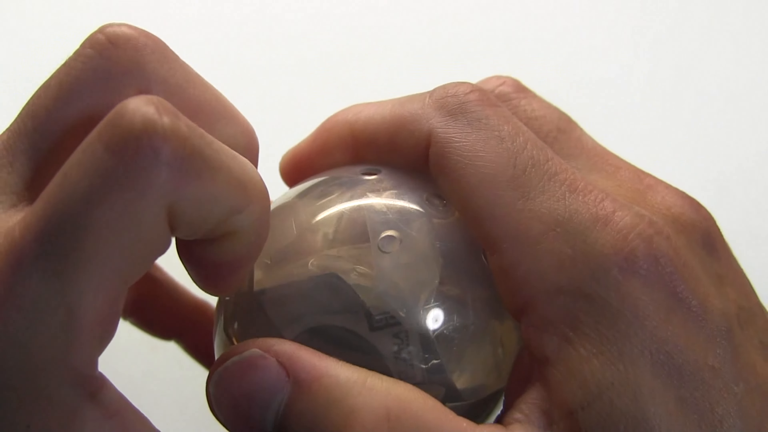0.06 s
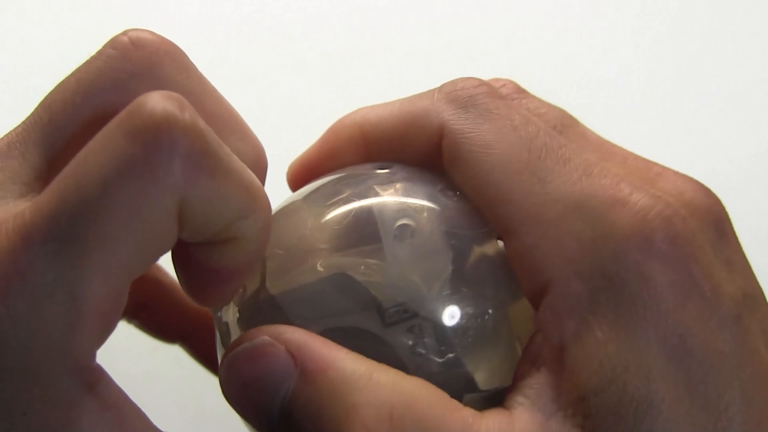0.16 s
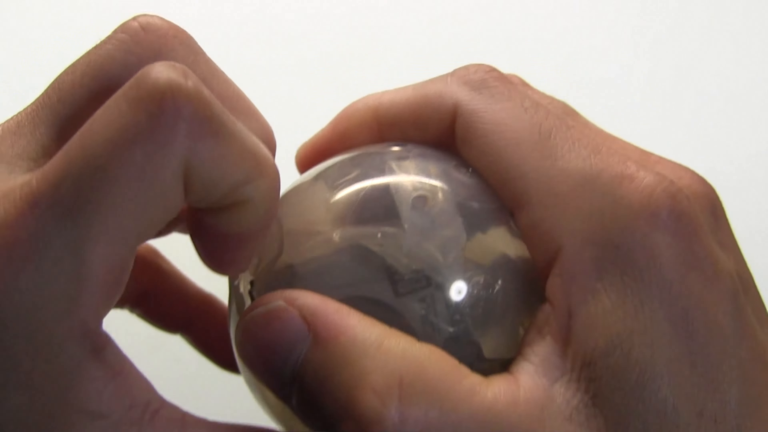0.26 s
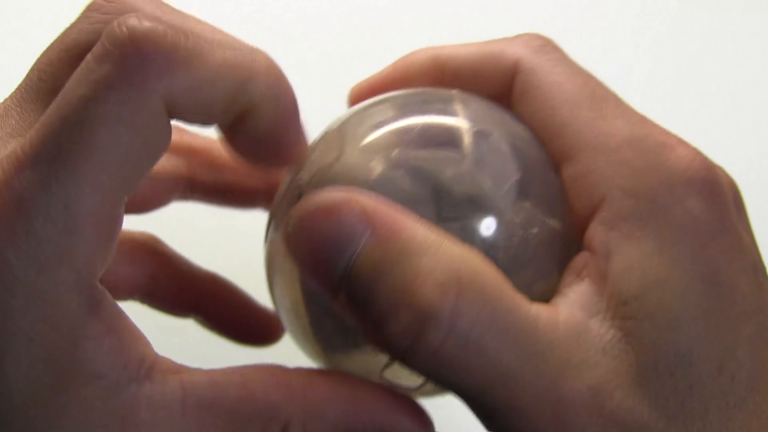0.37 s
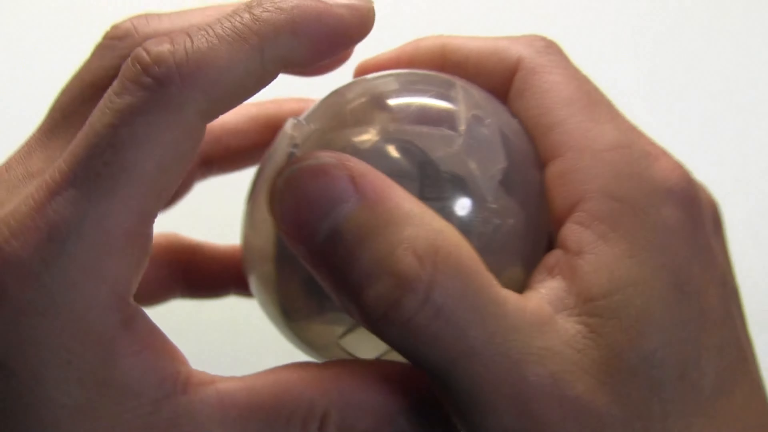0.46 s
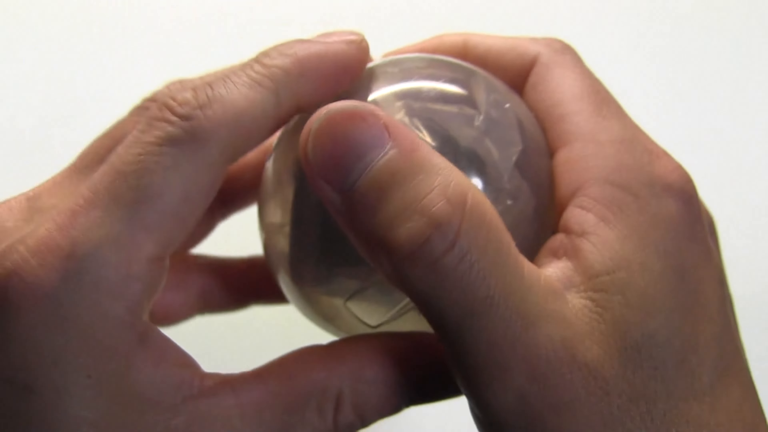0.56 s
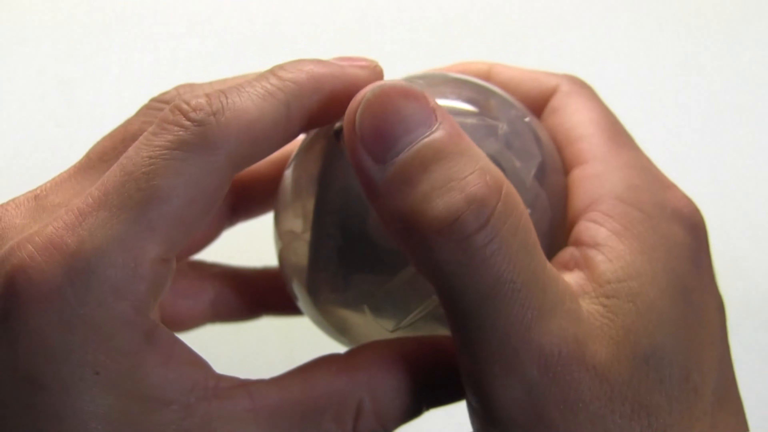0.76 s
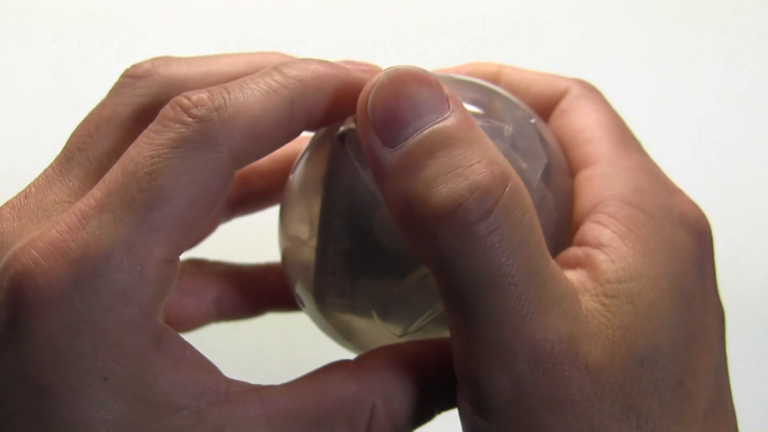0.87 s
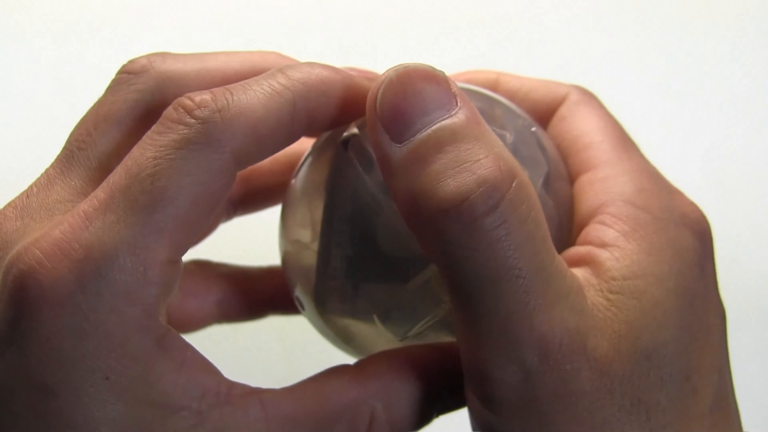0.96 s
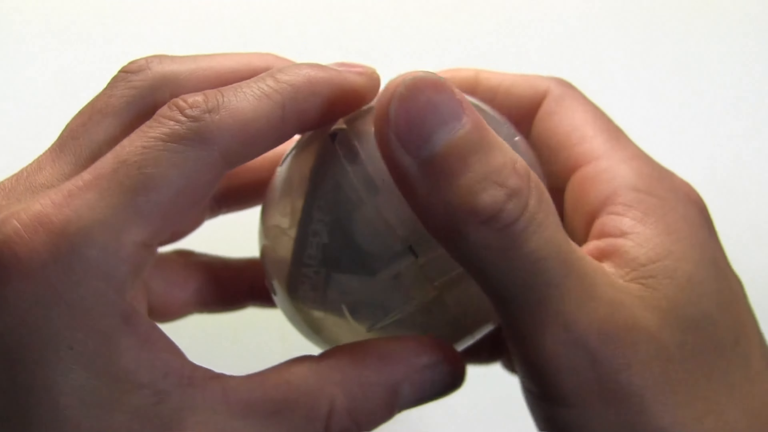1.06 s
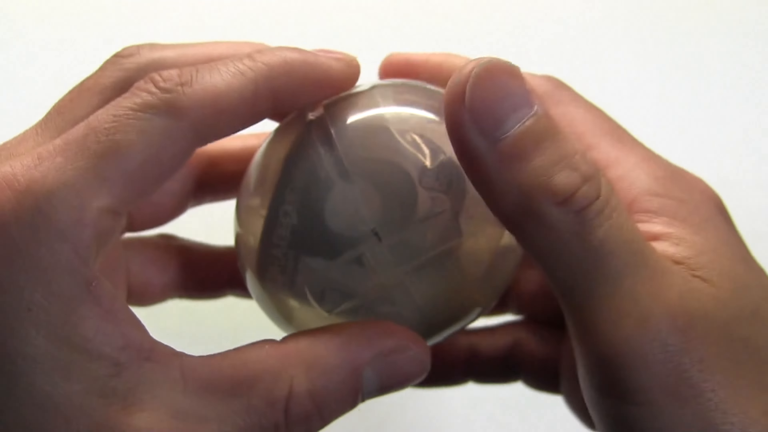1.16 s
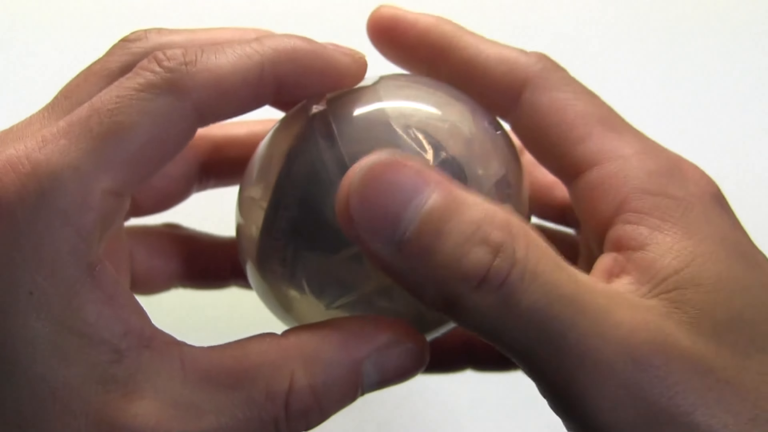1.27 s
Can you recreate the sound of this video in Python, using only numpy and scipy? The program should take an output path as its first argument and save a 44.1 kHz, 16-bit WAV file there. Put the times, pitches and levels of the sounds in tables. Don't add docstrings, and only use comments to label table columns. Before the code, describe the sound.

Two hard plastic clicks from a squeezed hollow shell, followed by light rattling ticks, close up

```python
import sys
import numpy as np
from scipy import signal
from scipy.fft import rfft, irfft
from scipy.io import wavfile

SR = 44100
rng = np.random.default_rng(int(sys.argv[2]) if len(sys.argv) > 2 else 0)


def magnitude_from_level(level_db):
    exponent = np.asarray(level_db, float) / 20
    return 10 ** exponent


def transcribe(signal):
    frames = np.atleast_2d(signal).T
    limited = np.clip(frames, -1, 1)
    pcm = np.round(limited * 32767).astype(np.int16)
    wavfile.write(sys.argv[1], SR, pcm)


N = 57330


def evened(x):
    return x / np.sqrt(np.mean(x ** 2) + 1e-20)


def read(points, hz):
    f, value = np.transpose(points)
    return np.interp(np.log(hz + 1), np.log(f + 1), value)


def add(mix, s, sound):
    part = mix[max(round(s * SR), 0):][:len(sound)]
    part += sound[:len(part)]


def colour(x, gain):
    return irfft(rfft(x) * gain(np.fft.rfftfreq(N, 1 / SR)), N)


# frequency_hz, level_db
AIR_TONE = [(25, -25), (60, -9), (150, -9.5), (250, -8), (420, -9), (820, -9), (7700, -22.5), (16000, -33)]
AIR_DB = -62
# centre_hz, width_hz, level_db
HUM = [(59, 14, -79.5), (153.1, 33, -72), (263.7, 45, -69.5), (353.2, 52, -74.5)]
# frequency_hz, coherence (0 to 1)
COHERENCE = [(60, 0.81), (290, 0.27), (700, 0.37), (1400, .35), (3100, 0.74), (8000, .4), (15000, .1)]


def air():
    first, second, hum_noise = rng.standard_normal((3, N))

    def alike(hz):
        return np.clip(read(COHERENCE, hz), 0, 1)

    def unlike(hz):
        return np.sqrt(1 - alike(hz) ** 2)

    pair = np.array([first, colour(first, alike) + colour(second, unlike)])
    out = magnitude_from_level(AIR_DB) * evened(colour(pair, lambda hz: magnitude_from_level(read(AIR_TONE, hz))))
    for centre_hz, width_hz, db in HUM:
        hum = colour(hum_noise, lambda hz: 1 / (1 + (2 * (hz - centre_hz) / width_hz) ** 2))
        out = out + magnitude_from_level(db) * evened(hum)
    return out


# frequency_hz, density_db
SKIN_TONE = [(300, -33.5), (550, -7.5), (900, 1), (1400, -4.5), (2500, -4.5), (6000, -13), (10000, -20),
             (16000, -44.5)]
# middle_s, length_s, level_db, brightness_db_per_octave
SLIDES = [(0.004, 0.11, -68.5, 6), (0.213, 0.2325, -61, 1.5), (0.263, 0.0643, -52.5, -9),
          (0.281, 0.031, -70.5, -10), (0.413, 0.0603, -54, -5), (0.463, 0.2736, -60.5, 4.5),
          (0.59, 0.144, -62.5, -0.53), (0.667, 0.081, -60, -6), (0.775, 0.069, -60.5, -2),
          (0.901, 0.118, -55, 0.93), (0.96, 0.046, -58.5, 0), (1.001, 0.0492, -64, 1.5),
          (1.087, .06, -63.5, 0), (1.149, 0.0716, -60, 6.5), (1.202, 0.0846, -58.5, 2.5),
          (1.264, 0.0824, -65.5, 10.5)]
GRIT_PER_S, GRIT_DB = 16000, 1.1764


def skin():
    t, out = np.arange(N) / SR, np.zeros(N)
    slips = rng.random(N) < GRIT_PER_S / SR
    grit = slips * rng.standard_normal(N) * magnitude_from_level(GRIT_DB * rng.exponential(1, N))
    for middle_s, length_s, db, tilt_db in SLIDES:
        swell = np.cos(np.pi * np.clip((t - middle_s) / length_s, -.5, .5)) ** 2
        rub = colour(grit, lambda hz: magnitude_from_level(read(SKIN_TONE, hz) + tilt_db * np.log2(hz / 2000 + .01)))
        out += magnitude_from_level(db) * swell * evened(rub)
    return out


RISE_CYCLES = 0.3765


def ring(modes, scale):
    t = np.arange(SR // 20) / SR
    out = 0
    for k, (hz, db, t60_s) in enumerate(modes):
        decay = magnitude_from_level(db - 60 * t / t60_s)
        rise = 1 - np.exp(-t * hz * scale / RISE_CYCLES)
        out = out + (-1) ** k * decay * np.sin(2 * np.pi * hz * scale * t) * rise
    return out


TICK_DB, SLIPS_PER_S, FOLLOW = -1.5, 1800, 0.62


def rattle(events, bodies):
    out, t = np.zeros(N), np.arange(600) / SR
    draw = rng.random((len(events), 2, 600))
    for (s, db, *_, length_s), (when, size), body in zip(events, draw, bodies):
        decay = np.exp(-t / max(length_s, 1e-4))
        later = (when < SLIPS_PER_S / SR) * FOLLOW * (2 * size - 1) * decay
        sound = np.convolve(later + (t == 0), body)
        add(out, s, magnitude_from_level(db + TICK_DB) * sound / abs(sound).max())
    return out


# start_s, level_db, pitch_hz, overtones_db, rattle_s
TICKS = [(0.153, -49, 800, 15, 0.00315), (0.313, -46.5, 1114, 15, 0.003), (0.452, -35, 900, 9, 0.0044),
         (0.476, -42, 790, 0.5, 0.00376), (0.563, -38, 1037, -3, 0.0025), (0.5665, -32, 1090, -1, 0.0019),
         (.5695, -33.5, 1064, -5, 0.00247), (0.5839, -42, 780, 0.5, 0.0011),
         (.6023, -48.5, 1112, 12, 0.0019), (0.63, -41, 900, -1.5, 0.00099),
         (0.656, -44.5, 696, -11.5, 0.0024), (0.6651, -36.5, 1150, -6, 0.0047),
         (0.693, -30, 1093, -10.5, 0.00047), (0.7327, -40, 807, -2, 0.00177),
         (0.738, -43.5, 699, -15, 0.0039), (0.7611, -35.5, 1080, -11, 0.00196),
         (0.783, -47.5, 706, -7.5, 0.0025), (0.816, -50, 848, 3, 0.0043),
         (0.823, -47.5, 722, -13.5, 0.00225), (1.089, -49, 816, -14.5, 0.00506),
         (1.14, -46.5, 420, -10.5, 0.00546), (1.231, -51.5, 725, -12, 0.0066),
         (1.211, -38.5, 690, -5.5, 0.00258), (1.252, -50, 900, -13.5, 0.004),
         (1.258, -49, 1067, -12, 0.0031), (0.594, -50.5, 840, -12.5, .002), (0.57, -38.5, 1053, -7, 0.0021)]
# pitch_multiple, level_db, t60_s
KNOCK_MODES = [(1.0, 0, .011), (1.35, -3, .007), (1.65, -8, .006), (2.1, -2, .008), (2.55, -9, .006),
               (3.05, -10, .006)]
# start_s, level_db, pitch_scale, rattle_s
EDGES = [(0.158, -53, 0.64, .002), (.313, -49.5, 0.96, 0.0046), (0.5627, -47.5, 1.06, .002),
         (.567, -36, 1.051, 0.0042), (.6023, -39.5, 0.844, 0.0086), (0.632, -49.5, 0.96, 0.00089),
         (.657, -49.5, 0.935, .001), (0.666, -40, 1.03, 0.0028), (0.695, -46.5, 1, 0.00057),
         (0.762, -44.5, 0.922, 0.00154), (1.2109, -52, 1.4, .001)]
# frequency_hz, level_db, t60_s
EDGE_MODES = [(4205, -5.5, 0.0014), (5800, -4.5, 0.00362), (7700, -4.5, 0.00298), (8980, -5, 0.00165),
              (11380, -5.5, 0.00117)]
# start_s, level_db, pitch_hz, t60_s, rattle_s
PATCHES = [(.5625, -41, 3070, 0.013, 0.0029), (0.5695, -40, 2270, .01, 0.0023),
           (.5668, -35.5, 2217, 0.0099, .004), (.567, -36.5, 3083, 0.0124, 0.0032),
           (0.53, -45, 3550, .008, 0.0017), (.564, -45, 645, 0.0223, 0.00367),
           (0.52, -47.5, 3100, 0.0096, .002), (.6025, -45.5, 2270, 0.0102, .001),
           (0.629, -48.5, 3200, 0.0083, 0.00097), (.661, -50, 2570, 0.0079, .002),
           (.666, -42, 2580, 0.0096, 0.00275), (.667, -44.5, 3202, 0.0116, 0.00465),
           (0.55, -45, 4290, 0.0067, 0.0021), (.694, -35, 2314, 0.0087, 0.00168),
           (.6945, -43.5, 700, 0.03, 0.0033), (0.739, -46.5, 2360, 0.011, 0.0024),
           (0.76, -49, 3000, 0.0075, 0.00224), (.761, -43, 3193, 0.0066, 0.00093),
           (1.198, -51.5, 3150, 0.0153, .005), (1.2025, -52.5, 2260, 0.013, 0.0032),
           (1.211, -46.5, 2650, 0.0104, 0.00105), (1.2112, -47, 1166, 0.0089, 0.00192),
           (1.217, -48, 907, 0.0127, 0.0053), (.2109, -19, 1480, .006, .0002),
           (.2145, -35.5, 8000, .004, .001), (.2135, -34, 4600, 0.0046, .001),
           (.3135, -47, 5730, 0.0089, 0.0022), (.4362, -25.5, 5870, 0.0029, .0003),
           (.4385, -30, 4210, 0.0069, .001), (.438, -30.5, 5410, .005, .001),
           (.4375, -33, 7400, 0.0077, .002), (.4405, -37.5, 2360, 0.0063, .001),
           (.23, -44.5, 800, .02, .006), (.238, -44, 980, .02, .006), (.25, -44, 720, .02, .006),
           (.26, -46, 1000, .02, .006), (.269, -43, 798, 0.024, 0.0046),
           (.6934, -33, 1438, 0.0074, 0.00102), (0.85, -49.5, 674, 0.018, 0.0043),
           (.569, -42.5, 1500, 0.0097, .003), (0.26, -48.5, 7080, 0.0072, 0.00216)]


def ticks():
    knocks = []
    for _, _, hz, overtones_db, _ in TICKS:
        knocks.append(ring(KNOCK_MODES[:1], hz) + magnitude_from_level(overtones_db) * ring(KNOCK_MODES[1:], hz))
    touches = [ring(EDGE_MODES, scale) for _, _, scale, _ in EDGES]
    pings = [ring([(hz, 0, t60_s)], 0.9988) for _, _, hz, t60_s, _ in PATCHES]
    return rattle(TICKS, knocks) + rattle(EDGES, touches) + rattle(PATCHES, pings)


# start_s, level_db, first_treble_db, second_slip_after_s, second_treble_db
SNAPS = [
    (0.2107, 3.5, -0.5, 0.00033, -2),
    (0.4353, -9, 1, 0.00078, -15),
]
# frequency_hz, level_db, t60_s
GRIPPED = [(743.7, 0.5, 0.00749), (1055.2, -6.5, 0.00892), (1825, -6, 0.00624), (2201, -7.5, 0.0054),
           (2812.6, -19, 0.00703), (3666.7, -16.5, 0.0052), (4440, -17, 0.004), (5686, -23, 0.005),
           (6484, -24.5, 0.004), (7400, -20.5, 0.004), (8310, -15, 0.003), (9379, -23.5, .003),
           (12200, -31, .003), (388.6, -12.5, 0.0076)]
# frequency_hz, level_db, t60_s
RIM = [(900, 2, 0.00573), (1150, -2.5, 0.00384), (1765.6, -14, 0.0102), (2373, -9.5, 0.00603),
       (3832, -19, 0.0084), (4652, -9.5, 0.00504), (5898, -8.5, 0.00404), (6780, -6, 0.00325),
       (7620, -3.5, 0.00306), (8510, -1.5, 0.00343), (10475, -18.5, 0.00522), (11550, -15.5, 0.00329),
       (12530, -17, 0.0032), (447.7, -18, 0.01)]
# level_db, t60_s
CRACKS = [(-19, 0.016), (-24.5, 0.022)]
# frequency_hz, level_db
CRACK_TONE = [(500, -21), (1500, 8), (3500, -1.64), (8500, -6.5), (11000, -17), (16000, -21.5)]
CRACK_RISE_S = 0.00014
SENSE = 1, -1
LEAD_DB, LEAD_S = -15, 0.0006155
BOUNCE_DB, BOUNCE_TREBLE_DB, BOUNCE_S = -17.5, -7, .0048


def snaps():
    out, t = np.zeros(N), np.arange(SR // 20) / SR
    for snap, modes, (crack_db, t60_s), sense in zip(SNAPS, (GRIPPED, RIM), CRACKS, SENSE):
        s, db, first_db, gap_s, second_db = snap
        low = sense * magnitude_from_level(db) * ring(modes[:2] + modes[-1:], 0.9766)
        high = magnitude_from_level(db) * ring(modes[2:-1], 0.9914)
        noise = colour(rng.standard_normal(N), lambda hz: magnitude_from_level(read(CRACK_TONE, hz)))
        rise = np.minimum(t / CRACK_RISE_S, 1)
        crackle = evened(noise)[:len(t)] * magnitude_from_level(crack_db - 60 * t / t60_s) * rise
        add(out, s - LEAD_S, -magnitude_from_level(LEAD_DB) * low)
        add(out, s, low + magnitude_from_level(first_db) * high + crackle)
        add(out, s + gap_s, magnitude_from_level(second_db) * high)
        add(out, s + BOUNCE_S, magnitude_from_level(BOUNCE_DB) * (low + magnitude_from_level(BOUNCE_TREBLE_DB) * high))
    return out


# frequency_hz, t60_s
ROOM_T60 = [(300, .13), (800, 0.1686), (1400, 0.19), (2500, .15), (5000, 0.079), (12000, .06)]
# frequency_hz, level_db
ROOM_TONE = [(300, -6.5), (800, -9), (1400, -6.5), (2500, -6.5), (6000, 0), (14000, -16.5)]
ROOM_DB, ROOM_START_S = -24, .003
SHARED = .7


def room(x):
    taps = np.zeros((2, SR // 2))
    at = np.arange(0, SR // 2 - 20, 20) + rng.integers(0, 20, (2, (SR // 2 - 1) // 20))
    sign = rng.choice([-1., 1.], at.shape)
    np.put_along_axis(taps, at, sign, 1)
    taps = (taps + SHARED * taps[::-1]) * (np.arange(SR // 2) > ROOM_START_S * SR)
    hz, t, z = signal.stft(taps, SR, nperseg=128)
    decay_db = read(ROOM_TONE, hz)[:, None] - 60 * t / read(ROOM_T60, hz)[:, None]
    tail = signal.istft(z * magnitude_from_level(decay_db), SR, nperseg=128)[1]
    return signal.fftconvolve(x[None], tail / np.linalg.norm(tail[0]), axes=1)[:, :N]


# frequency_hz, left_over_right_db
LEAN = [(60, -0.5), (500, 1.49), (2000, 0.61), (8000, 0.59), (14000, -3)]
LOW_CUT_HZ, TOP_HZ = 321.5, 14500
PUSH_DB = -15
DELAY_S = 4e-6


def scene():
    shell = skin() + ticks() + snaps()
    near = signal.lfilter(*signal.butter(2, LOW_CUT_HZ, "high", fs=SR), shell) + magnitude_from_level(PUSH_DB) * shell
    near = signal.lfilter(*signal.butter(3, TOP_HZ, fs=SR), near)
    pair = []
    for side in (.5, -.5):
        pair.append(colour(near, lambda hz: magnitude_from_level(side * read(LEAN, hz))
                           * np.exp(2j * np.pi * hz * side * DELAY_S)))
    return np.array(pair) + magnitude_from_level(ROOM_DB) * room(near) + air()


def roll_off(x):
    return signal.sosfilt(signal.butter(12, 16460, fs=SR, output="sos"), x)


CEILING, EDGE_HZ = .98, 16400


def record(dry):
    x = dry / (1 + (abs(dry) / CEILING) ** 8) ** (1 / 8)
    low_pass = signal.firwin(255, EDGE_HZ, window=("kaiser", 9), fs=SR)
    mix = signal.oaconvolve(x, low_pass[None], "same")
    return roll_off(mix)


dry = scene()
out = record(dry)
transcribe(out)
```